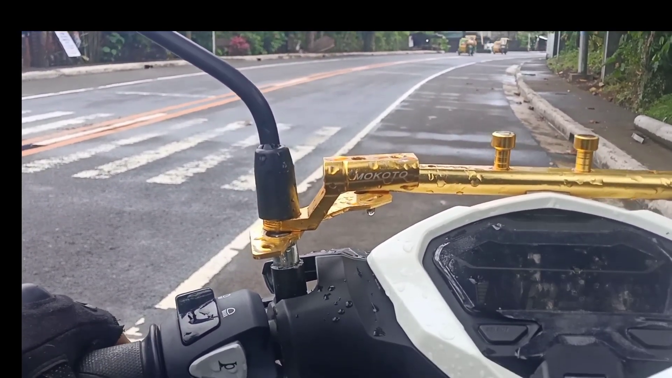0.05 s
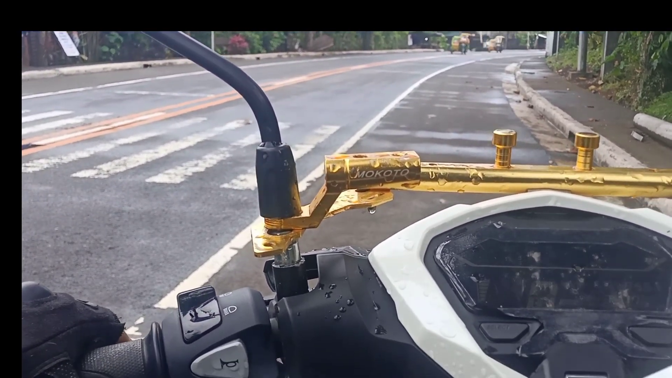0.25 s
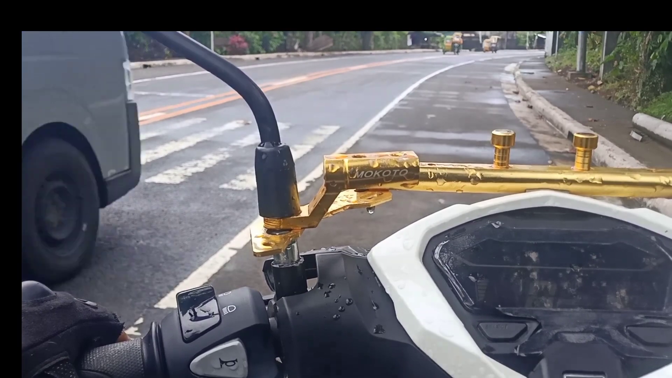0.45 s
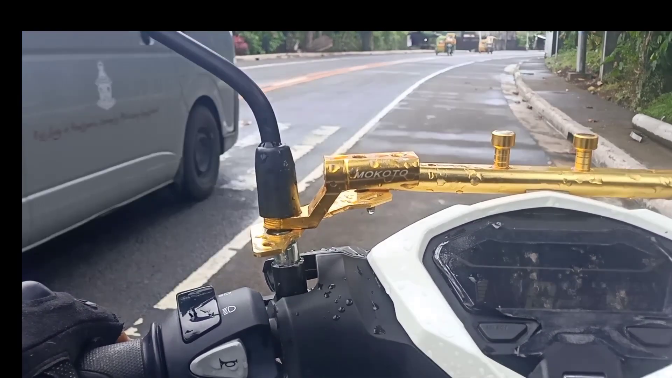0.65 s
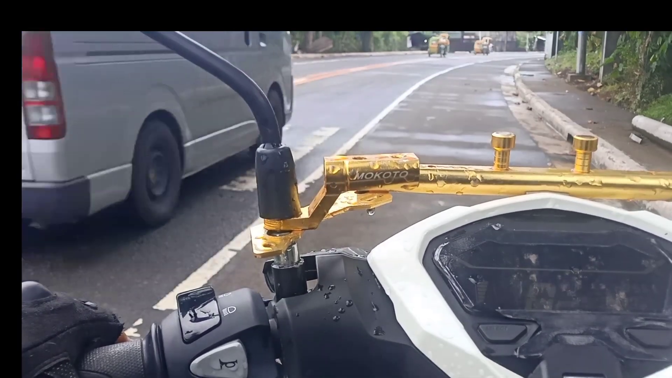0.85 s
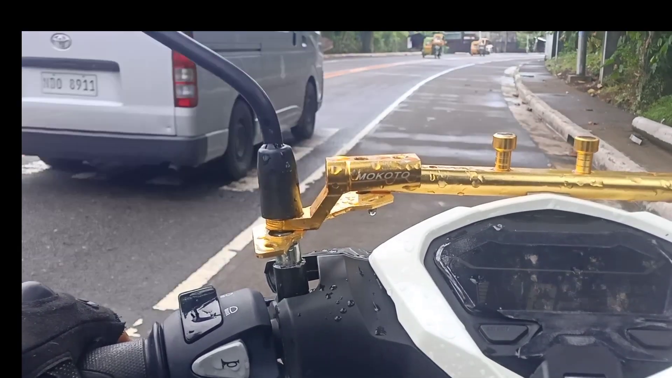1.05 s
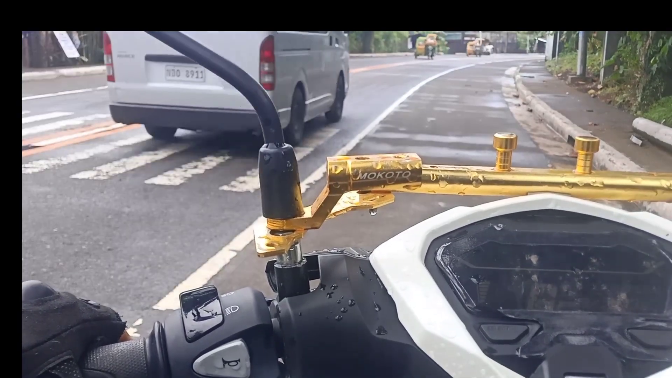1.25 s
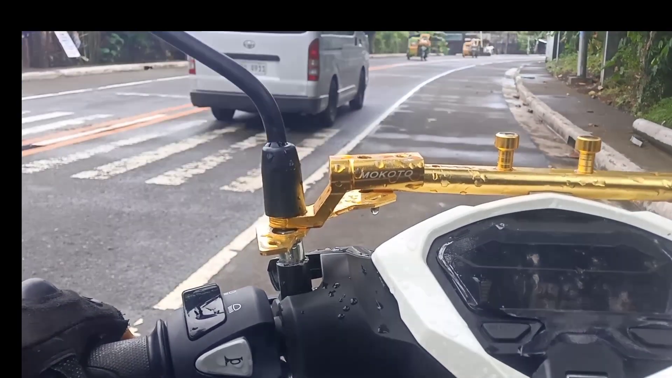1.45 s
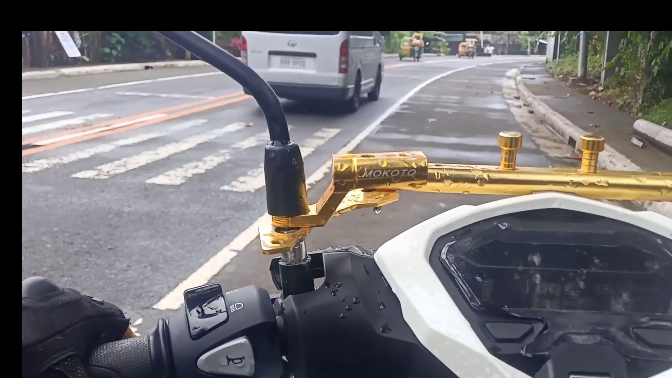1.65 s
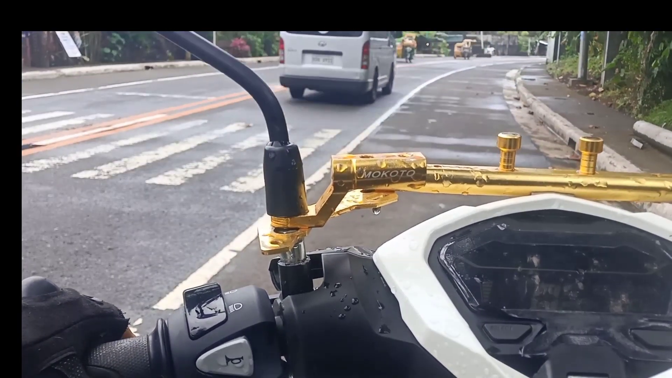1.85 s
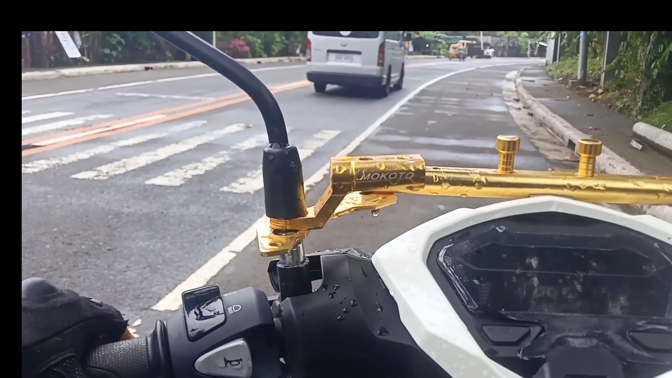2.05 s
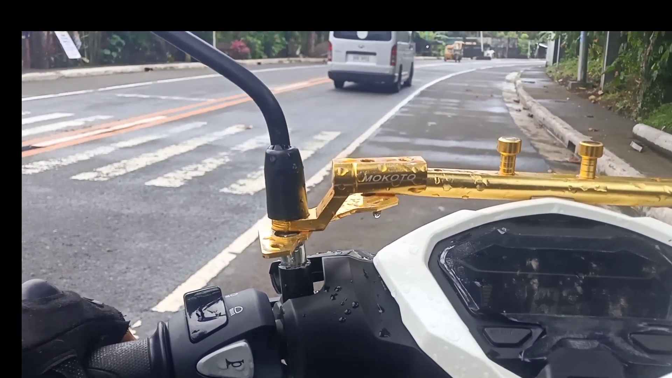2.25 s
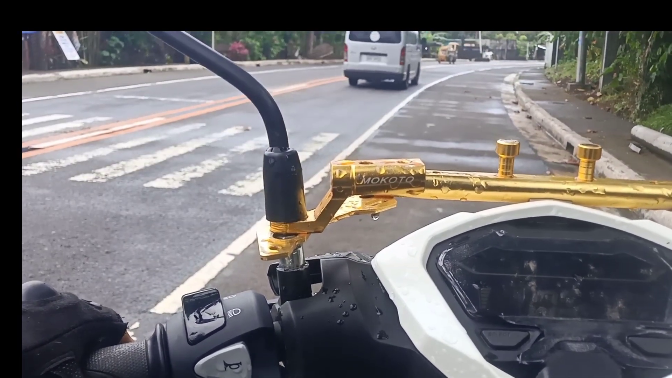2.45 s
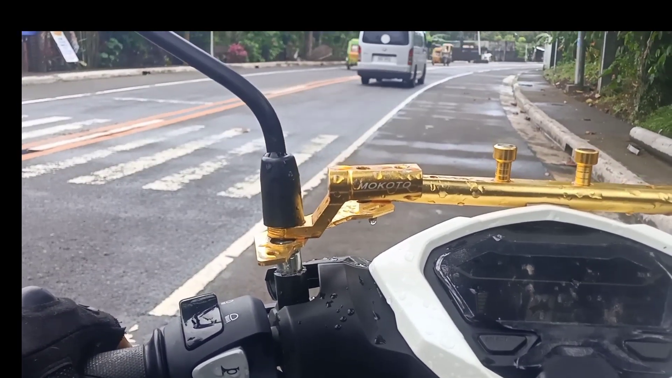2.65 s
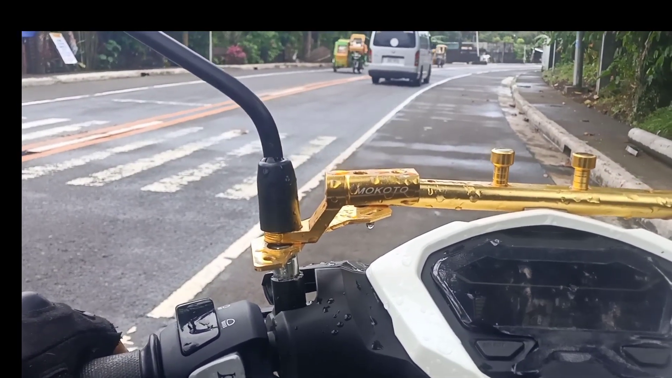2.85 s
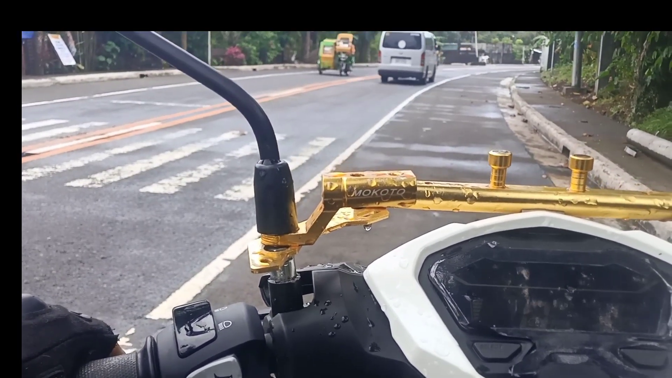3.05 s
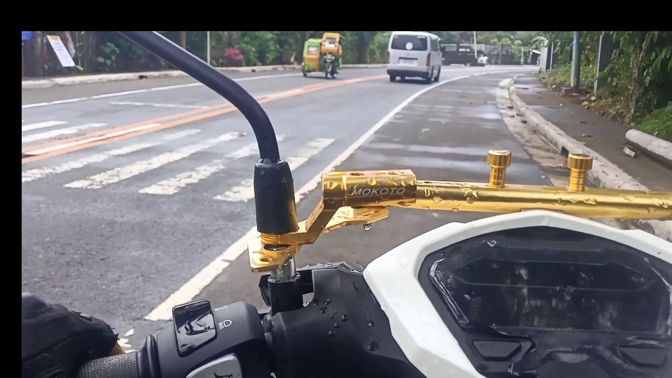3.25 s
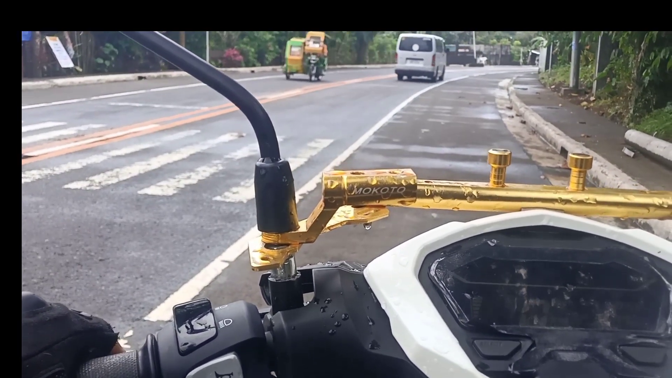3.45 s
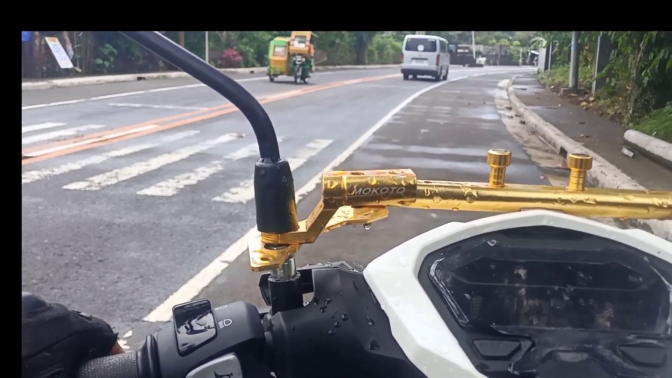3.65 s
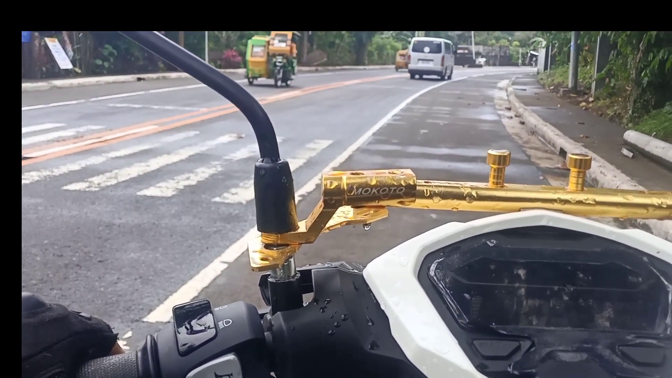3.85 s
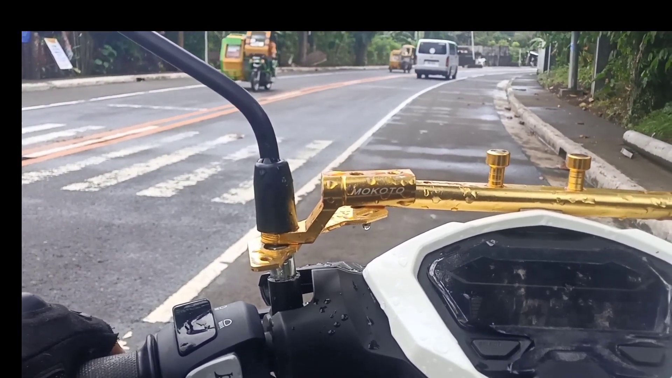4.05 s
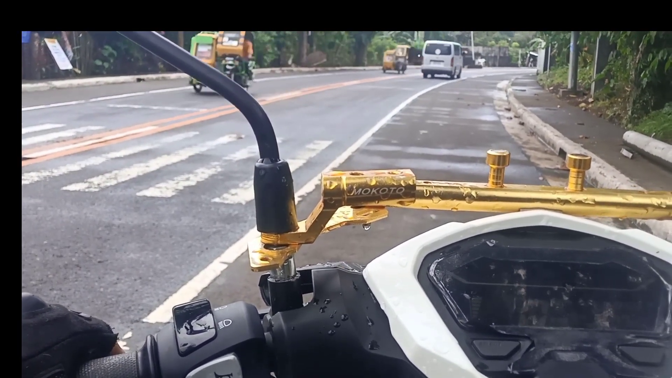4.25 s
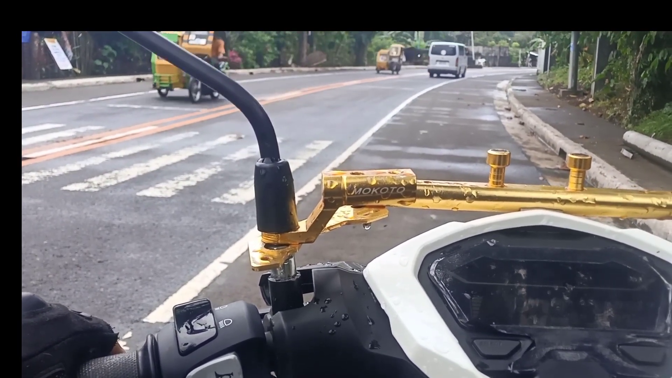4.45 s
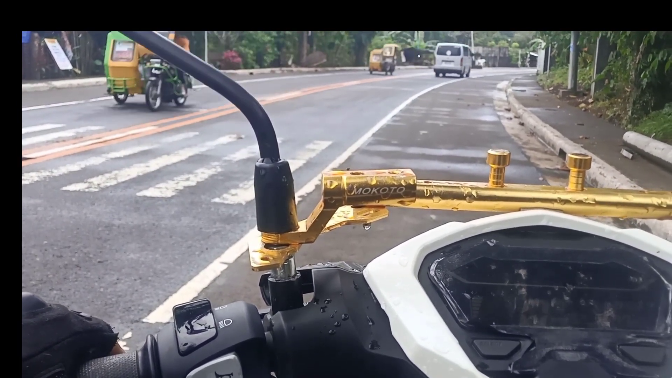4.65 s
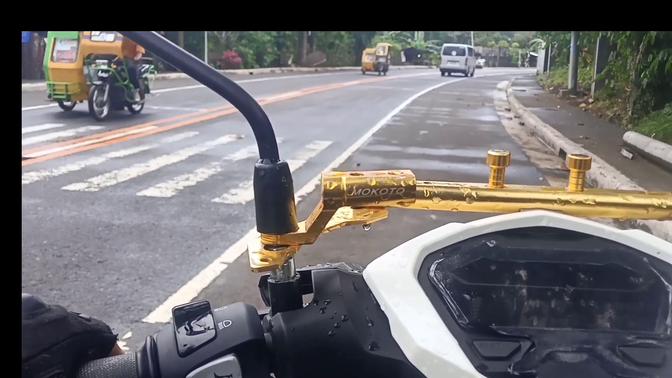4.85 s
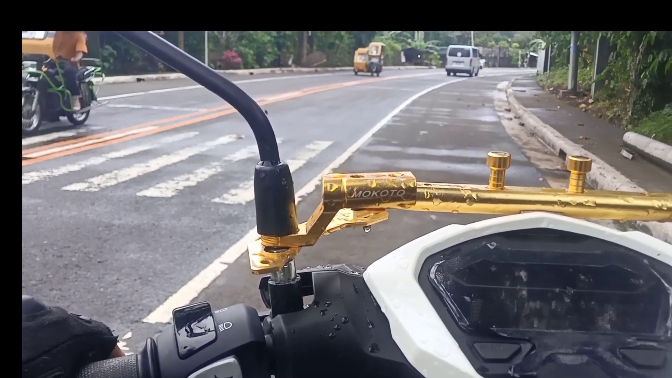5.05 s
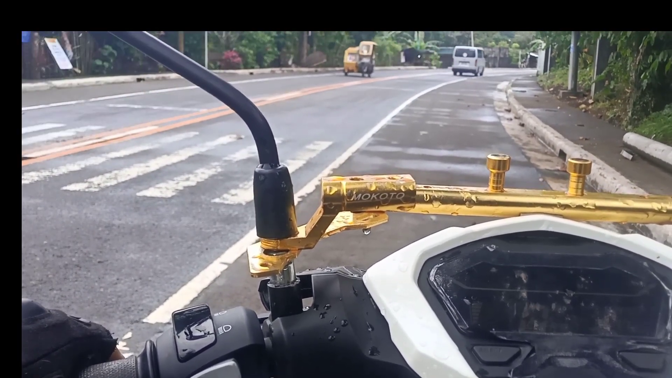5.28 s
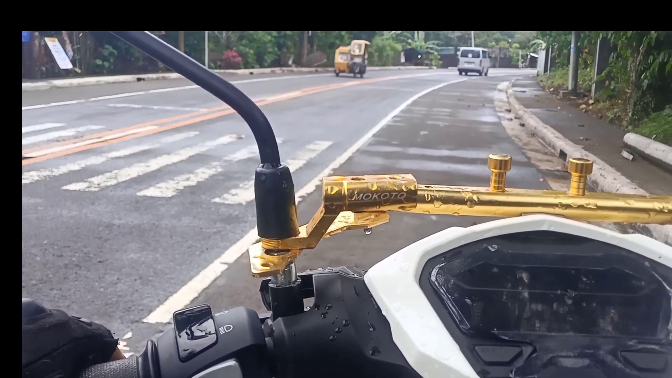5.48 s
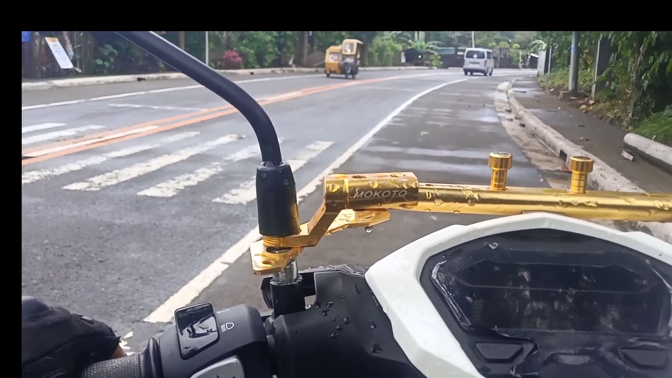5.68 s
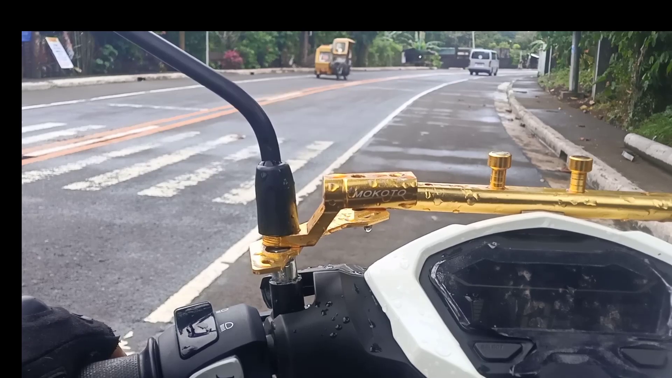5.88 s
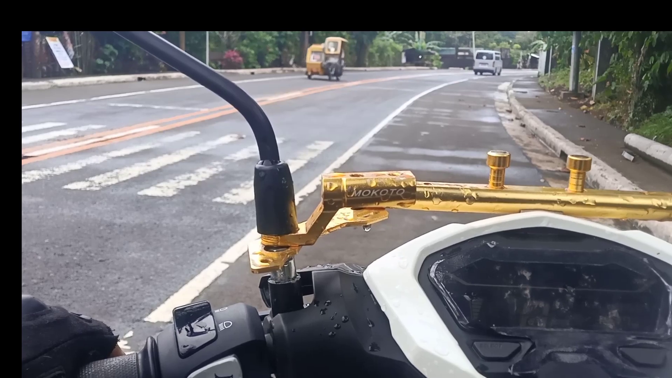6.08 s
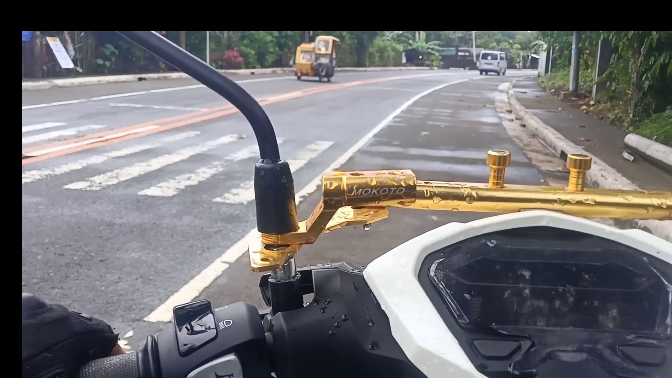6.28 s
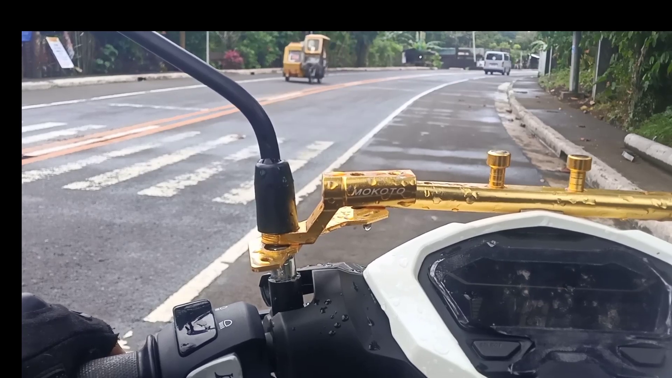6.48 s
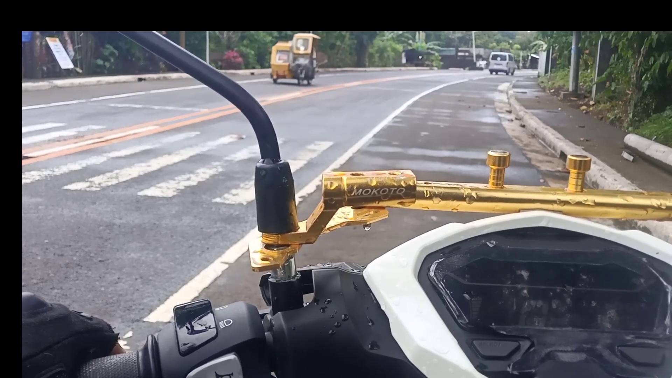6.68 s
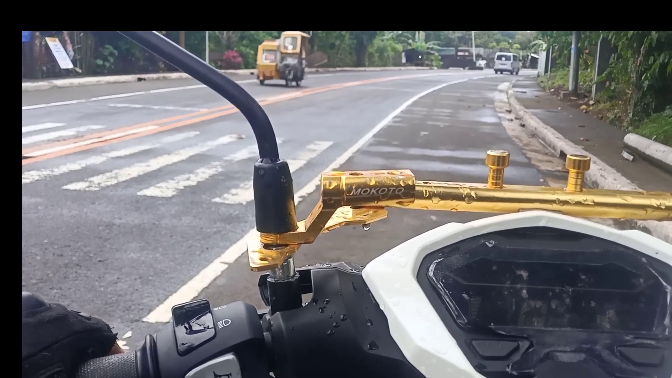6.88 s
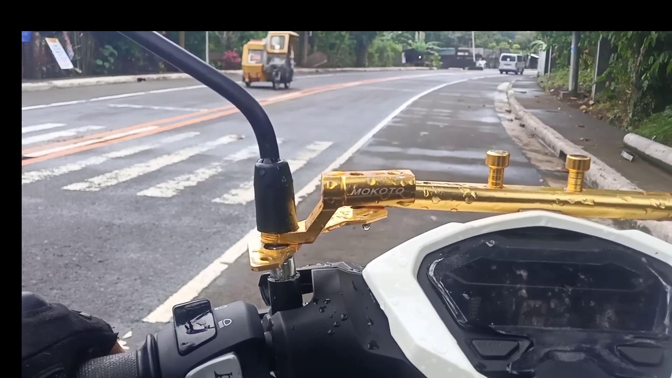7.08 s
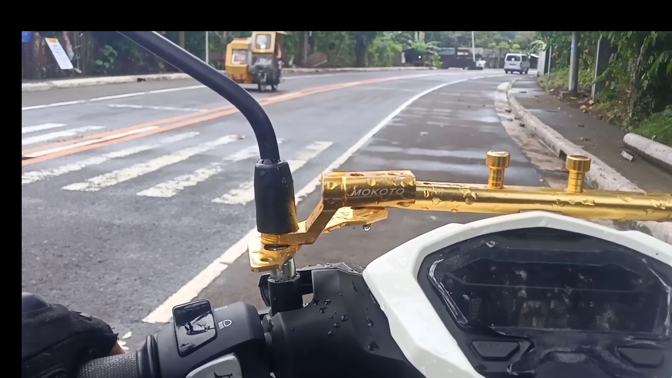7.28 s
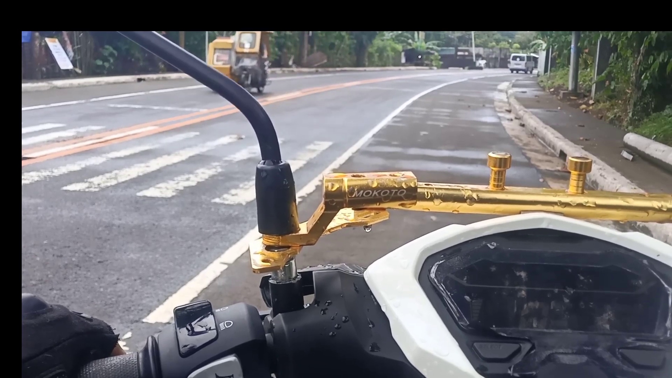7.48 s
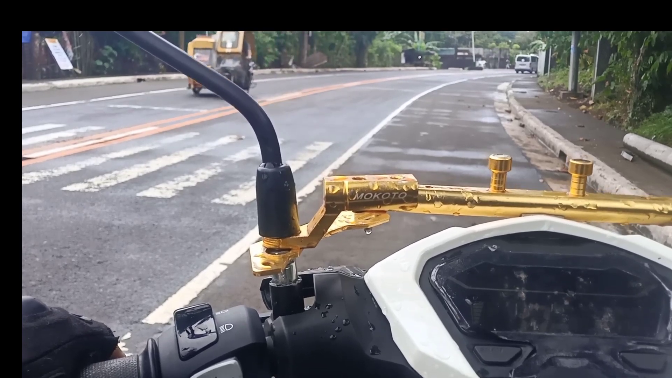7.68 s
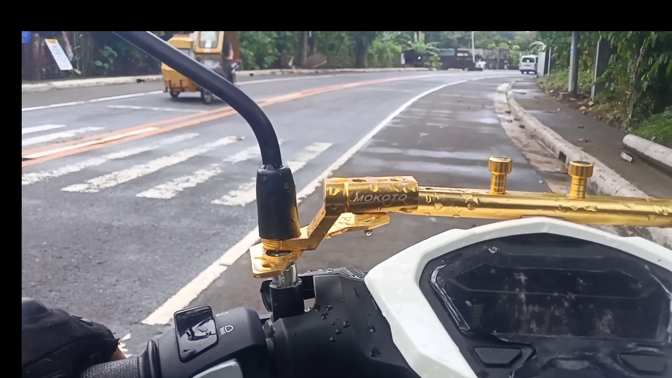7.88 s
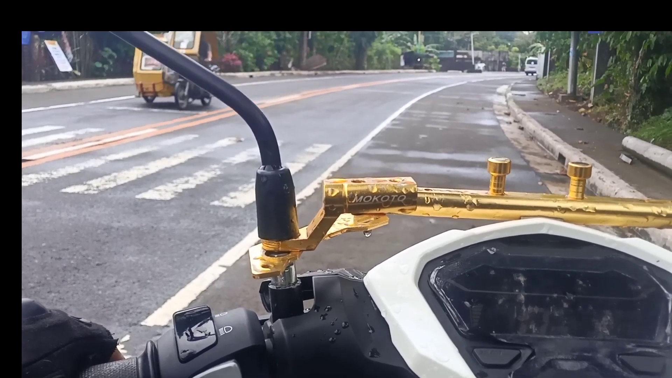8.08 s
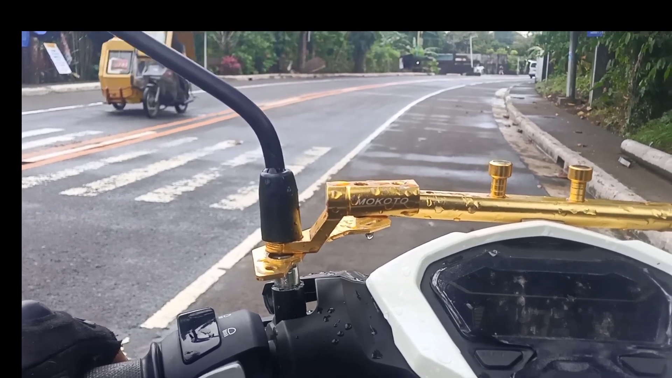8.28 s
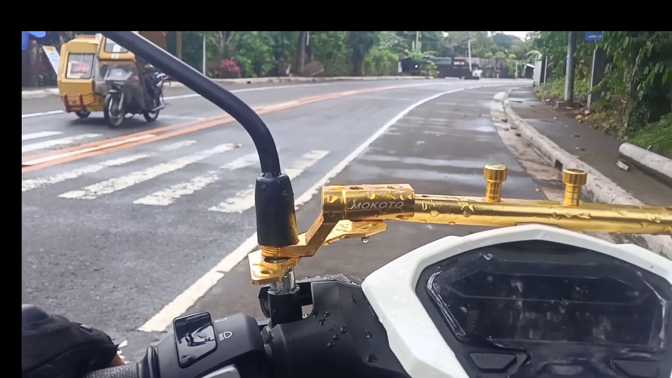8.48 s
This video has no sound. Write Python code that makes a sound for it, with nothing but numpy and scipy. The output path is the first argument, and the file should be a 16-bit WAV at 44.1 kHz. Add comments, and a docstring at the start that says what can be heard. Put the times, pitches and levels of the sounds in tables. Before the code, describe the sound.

A van passes close on a damp road, followed by small motor tricycles puttering and rattling past, with distant traffic underneath.

```python
"""Van and motor tricycles at the roadside.

Heard from a waiting scooter: a diesel van pulls past and drives off, changing gear; its roar and tyre noise
throb with the firing. Single-cylinder tricycles chug along the far lane, slowing: blows ring muffler and pipe,
tin cabs rattle. Damp-road traffic rumbles and hisses underneath. Two microphone ports, alike in the bass, out
of step in the middle; the left one is brighter."""
import sys
import numpy as np
from scipy import signal
from scipy.fft import rfft, irfft, next_fast_len
from scipy.io import wavfile
from scipy.ndimage import uniform_filter1d, map_coordinates

SR = 44100
rng = np.random.default_rng(int(sys.argv[2]) if len(sys.argv) > 2 else 0)


def put_to_file(sound):
    """Save the sound as 16-bit audio at rate SR, in the file named by the first command-line argument."""
    columns = np.atleast_2d(sound).T  # one column per channel
    safe = np.clip(columns, -1, 1)
    whole_steps = np.round(safe * 32767)
    wavfile.write(sys.argv[1], SR, whole_steps.astype(np.int16))


N = 376173
TIME_S = np.arange(N) / SR
LEFT_RIGHT = np.array([[.5], [-.5]])
BLOW_LEAD_S = 0.001  # a blow's suction peaks this long before the firing count turns

# tin cab modes: centre_hz, width_hz, gain_db
TIN_MODES = [(2138, 570, 3.5), (2816, 490, 2), (4130, 770, -4.5)]


def amp(db):
    return 10 ** (np.asarray(db) / 20)


def unit(x):
    return x / np.sqrt(np.mean(x ** 2) + 1e-20)


def along(points, hz):
    """Interpolate (hz, value) points on a log axis."""
    knots_hz, values = np.transpose(points)
    return np.interp(np.log(hz + 1), np.log(knots_hz + 1), values)


def curves(rows):
    """One value per sample for each column after the time."""
    knots_s, *columns = np.transpose(rows)
    return [np.interp(TIME_S, knots_s, column) for column in columns]


def fade(zero_s, full_s):
    return np.clip((TIME_S - zero_s) / (full_s - zero_s), 0, 1)


def wobble(rate_hz):
    """Smooth random curve."""
    return map_coordinates(rng.standard_normal(int(N * rate_hz / SR) + 4), [TIME_S * rate_hz])


def passing(peak_s, rise_s, fall_s, peak_db=0):
    """Level in dB of a passing source: amplitude falls as 1 / distance."""
    t = TIME_S - peak_s
    return peak_db - 10 * np.log10(1 + (t / np.where(t < 0, rise_s, fall_s)) ** 2)


def filtered(x, response):
    """Apply a complex response(hz)."""
    size = next_fast_len(N + SR // 2)
    return irfft(rfft(x, size) * response(np.fft.rfftfreq(size, 1 / SR)), size)[..., :N]


def resonant(x, modes):
    """Parallel resonances of alternating sign."""
    return filtered(x, lambda hz: sum(
        (-1) ** k * amp(db) * 1j * hz * width / (centre ** 2 - hz ** 2 + 1j * hz * width)
        for k, (centre, width, db) in enumerate(modes)))


def swept(x, gain_db):
    """Apply a moving gain_db(hz, sample index)."""
    hz, t, bins = signal.stft(x, SR, nperseg=512)
    at = np.clip((t * SR).astype(int), 0, N - 1)
    return signal.istft(bins * amp(gain_db(hz[:, None] + 1, at)), SR, nperseg=512)[1][:, :N]


def spread(pair):
    """Mix two unrelated signals into partly correlated stereo."""
    # left-right likeness: freq_hz, correlation
    likeness = [(60, 0.9915), (250, 0.9875), (450, 0.92), (650, 0.65), (950, 0.35), (1120, .45),
                (1300, 0.75), (1550, .6), (1800, .25), (2150, 0.5), (2500, .6), (3000, 0.25), (4000, 0.22),
                (8000, 0.44)]
    angle = lambda hz: np.arccos(along(likeness, hz)) / 2
    mid, side = filtered(pair, lambda hz: np.array([np.cos(angle(hz)), np.sin(angle(hz))]))
    return np.array([mid + side, mid - side])


def rush(spectrum, patchy_db):
    """Stereo noise of rms 1 with patches of random gain."""
    bins = signal.stft(rng.standard_normal((2, N)), nperseg=512)[2]
    patches = uniform_filter1d(uniform_filter1d(rng.standard_normal(bins.shape[1:]), 6, 0), 14, 1)
    pair = signal.istft(bins * amp(patchy_db * unit(patches)), nperseg=512)[1][:, :N]
    return unit(spread(filtered(pair, lambda hz: amp(along(spectrum, hz)))))


def roadside_echo(x, wet_db):
    """Direct sound plus a short tail off wall and trees."""
    # tail decay: freq_hz, t60_s
    decay = [(100, 0.36), (1000, 0.36), (6000, 0.093)]
    hz, t, bins = signal.stft(rng.standard_normal((2, SR // 3)), SR, nperseg=256)
    tail = signal.istft(bins * amp(-60 * t / along(decay, hz)[:, None]), SR, nperseg=256)[1]
    wet = signal.fftconvolve(x[None], tail / np.linalg.norm(tail[0]), axes=1)[:, :N]
    return x + amp(wet_db) * spread(wet)


def partials(cycles, multiples, levels_db, flutter_db, in_step=False):
    """Fluttering multiples of one rotation; in step, they dip together once a cycle."""
    return sum(-np.sqrt(2) * amp(db + flutter_db * wobble(9.3))
               * np.cos(2 * np.pi * (k * cycles + (0 if in_step else rng.uniform())))
               for k, db in zip(multiples, levels_db))


def van():
    """Four cylinders: clean crank orders, plus noise that throbs twice a turn."""
    # revs climb, then sink at the gear change: time_s, crank_hz
    revs = [(0.0, 33.2), (0.62, 35.8), (1.13, 37.5), (1.75, 39.9), (1.99, 39.3), (2.27, 36.0)]
    # tones, each loudest as its part draws level: order, peak_s, rise_s, fall_s, peak_db
    orders = [(5, 0.76, 0.046, 0.222, -24.5), (6, 0.36, 0.5, 0.9, -30), (5.5, 0.96, 0.13, 0.28, -29),
              (6.5, 1.3, 0.34, 0.24, -31), (7, 0.86, 0.17, 0.2, -30.5)]
    # engine drone: time_s, order2_db, order4_db
    drone = [(0.0, -21, -27), (0.16, -23.5, -23), (0.69, -18, -26.5), (0.87, -27.5, -35),
             (0.94, -28, -50.5), (1.18, -32, -36), (1.56, -33, -52), (1.89, -33, -31.5), (1.98, -35, -48.5),
             (2.26, -35, -35), (2.35, -42, -52.5), (2.45, -48, -39)]
    # noise spectra of the van's parts: freq_hz, density_db
    roar_shape = [(15, -50), (25, -34), (60, -8), (112, -12.5), (227, 3.5), (297, -2.5), (502, -8),
                  (574, -8.5), (763, -9.5), (900, -26), (1170, -45), (1980, -120)]
    tyre_shape = [(290, -42), (500, 9), (546, 3), (666, -2.5), (780, 0), (1060, 2.5), (1390, -1),
                  (1560, -1), (1830, -6), (2610, -8), (3180, -17.5), (3750, -24), (4280, -27.5),
                  (4990, -30), (5520, -30), (6950, -45), (9040, -48), (15300, -120)]
    flank_shape = [(290, -61), (450, -8.5), (640, -7.5), (780, 1), (950, -5), (1500, -17), (2300, -11.5),
                   (3300, -9), (3800, -14), (4100, -23), (4600, -27), (5100, -31), (5450, -20), (5900, -28),
                   (6950, -41), (9000, -40), (14500, -23.5), (15400, -30)]
    rear_shape = [(220, -60), (340, -2), (520, 0), (640, -3), (770, 2.5), (1000, -7), (1450, -13),
                  (2000, -13), (2350, -10), (2900, -13), (3600, -24), (5000, -38), (5450, -30), (6500, -60)]
    turns = np.cumsum(curves(revs)[0]) / SR
    throb = np.cos(4 * np.pi * turns)
    orders_db = [passing(*row[1:]) for row in orders]
    tones = partials(turns, [row[0] for row in orders], orders_db, flutter_db=1.52)
    tones += partials(turns, (2, 4), curves(drone), flutter_db=0.6)
    roar = amp(passing(0.4, 0.7, 0.55, peak_db=-20.5) + 1.3 * throb) * rush(roar_shape, patchy_db=-2.5)
    tyre_db = passing(0.12, 2.3, 0.5, peak_db=-22)
    db_per_octave = 1.5 + 0.067 * (tyre_db - tyre_db.max())  # duller with distance
    tyres = swept(rush(tyre_shape, patchy_db=1), lambda hz, i: db_per_octave[i] * np.log2(hz / 1500))
    tyres *= amp(tyre_db + 1.1 * throb)
    beaming = 4  # directional: fades faster than by distance alone
    flank = amp(-25 + beaming * passing(0.4, 0.45, 0.33) + 2.1 * throb) * rush(flank_shape, patchy_db=1.5)
    rear = amp(-23 + beaming * passing(0.62, 0.4, 0.5) + 1.5 * throb) * rush(rear_shape, patchy_db=2.5)
    return tones * fade(2.5, 2.3) + flank + rear + (roar + tyres) * fade(2.78, 1.728)


def far_traffic():
    """Lumpy rumble and smoother tyre hiss."""
    # traffic levels: time_s, rumble_db, hiss_db
    levels = [(0, -28.5, -32.5), (2.5, -30.5, -41.5), (4, -27.5, -40.5), (4.8, -27.5, -39.5),
              (6.1, -26, -36), (6.6, -29, -39), (7.1, -32, -42), (7.8, -31.5, -40.5), (8.2, -30, -39),
              (8.53, -28.5, -35)]
    # traffic spectra: freq_hz, density_db
    rumble_shape = [(12, -53), (20, -28), (48, -16), (94, -1.5), (125, -2.5), (281, -6), (393, -13),
                    (524, -11), (831, -20.5), (900, -16), (1170, -55), (1980, -120)]
    hiss_shape = [(290, -30), (500, 3), (623, -7.5), (794, -2.5), (839, -13.5), (947, -2), (1020, 3.5),
                  (1400, -5.5), (1560, -3), (1770, -5), (2790, -11), (3150, -14.5), (3880, -22),
                  (5340, -25.5), (5830, -24), (6950, -34), (9040, -37.5), (14500, -23.5), (15400, -29.5)]
    rumble_db, hiss_db = curves(levels)
    rumble = amp(rumble_db - 1 + 1.3 * wobble(7)) * rush(rumble_shape, patchy_db=0)
    return rumble + amp(hiss_db + 0.22 * wobble(5)) * rush(hiss_shape, patchy_db=1.3)


def road_reflection(x):
    """The echo off the road hollows out one moving band, at times lifts it."""
    # interference band: time_s, centre_hz, gain_db
    hollow = [(.8, 850, 0), (1.1, 800, -7), (1.7, 780, -7), (2.3, 837, -3), (3.5, 801, -4),
              (4.8, 828.5, -7.5), (5.35, 875, -3), (5.6, 800, 2), (5.9, 788, 1), (6.3, 800, 3),
              (6.7, 800, 3), (7.2, 740, -2), (8.53, 740, -1)]
    centre_hz, gain_db = curves(hollow)
    return swept(x, lambda hz, i: gain_db[i] * np.exp(-(np.log(hz / centre_hz[i]) / 0.11) ** 2))


def knocks(hits, t60_cycles, noise):
    """Damped rings with an optional noise burst."""
    track, t = np.zeros(N + SR), np.arange(SR // 8) / SR
    for start_s, db, hz in hits:
        ring = np.sin(2 * np.pi * hz * t) + noise * rng.standard_normal(len(t))
        envelope = amp(db - 60 * t * hz / t60_cycles) * (1 - np.exp(-t * hz * 2.4))
        track[round(start_s * SR):][:len(t)] += envelope * ring
    return track[:N]


def low_thumps():
    """Dull low thumps."""
    # thumps: start_s, level_db, pitch_hz
    jolts = [(0.82, -7, 252.8), (0.939, -5, 215.2), (1.05, -11, 221.5), (1.1, -11, 222.3),
             (2.419, -14.5, 250.7), (5.546, -11.5, 139.8), (5.6555, -5.5, 150.2), (6.423, -18, 113),
             (7.231, -10.5, 138.1), (7.278, -16, 129.6), (7.52, -13.5, 135.5), (8.228, -11.5, 147.4),
             (8.265, -14.5, 139.2), (8.487, -14, 161.9)]
    return roadside_echo(knocks(jolts, t60_cycles=13, noise=0), wet_db=-4.5)


def clatter(blows, effort_db, low_hz, high_hz, high_db):
    """Valve gear and body: bands of noise that swell at each blow."""
    # upper band flares: peak_s, rise_db
    flares = [(7.24, 9), (7.51, 11)]
    # nearest tricycle's body band: time_s, centre_hz
    glide = [(5.2, 1106), (5.9, 981), (6.4, 930.4), (6.9, 802.3)]
    decay_s = 0.0048
    puffs = signal.lfilter([1], [1, -np.exp(-1 / (decay_s * SR))], np.abs(blows))
    noise = spread((uniform_filter1d(puffs, size=90) + 0.75) * rng.standard_normal((2, N)))

    def band(centre_hz, width):
        return unit(swept(noise, lambda hz, i: -12 * np.log1p((np.log(hz / centre_hz[i]) / width) ** 2)))

    flare_db = sum(db * np.exp(-((TIME_S - peak_s) / 0.025) ** 2) for peak_s, db in flares)
    low = amp(-46 + 0.65 * (effort_db + 33)) * band(low_hz, width=0.197)
    high = amp(high_db + flare_db) * band(high_hz, width=0.065)
    body_db = passing(6, 0.8243, 1.11, peak_db=-41.5) + LEFT_RIGHT  # 1 dB louder on the left
    return low + high + amp(body_db) * band(curves(glide)[0], width=0.14)


def firing_count():
    """Tricycle firings so far, restarting with each stretch."""
    # stretches (throttle open, coasting, open), each with rows: time_s, firing_hz
    stretches = [
        [(1.6219, 37.2), (2.25, 36.95), (3.55, 36.98)],
        [(3.6029, 35.05), (4.2, 35.95), (4.7, 30.39), (5.3, 27.62), (6.0, 26.16), (6.95, 22.76), (7.68, 26.87)],
        [(7.784, 26.6), (8.14, 26.85), (8.53, 27.6)],
    ]
    count = np.zeros(N)
    for rows in stretches:
        start = round(rows[0][0] * SR)
        count[start:] = np.cumsum(curves(rows)[0][start:]) / SR
    return count


def cylinder_blows(count):
    """Two trains of suction pulses, alike in timing, uneven in strength."""
    # strength scatter, least under throttle and when near: time_s, scatter_db
    scatter = [(2.6, 5), (2.9, 1), (3.45, 1), (3.6, 5), (4.8, 3.5), (5.1, 2.5), (6.3, 2.5), (7.2, 5),
               (7.8, 3)]
    # blows that stand out: time_s, level_db
    accents = [(3.763, 4), (3.802, 5), (3.83, 7), (3.857, 8), (4.069, 4), (4.287, 5), (4.392, 7), (4.58, 6),
               (4.774, 6), (4.807, 6), (5.073, 4), (5.151, 7), (5.187, 4), (5.258, 5), (5.294, 6),
               (5.44, 7), (5.477, 3), (5.55, 5), (5.586, 4), (5.661, 8), (5.698, 6), (5.773, 7), (5.81, 4),
               (5.848, 5), (5.924, 5), (5.962, 2), (6.038, 5), (6.194, 5), (6.273, 5), (6.35, 4),
               (6.393, 5), (6.43, 4), (7.896, 4), (8.151, 3), (8.188, 4), (8.445, 2), (8.481, 6)]
    at = np.flatnonzero(np.diff(np.floor(count)))
    jitter, strength, split = np.tanh(rng.standard_normal((len(at), 3))).T
    shift_s = 0.0006 * jitter - 1.5 * BLOW_LEAD_S
    at = np.clip(at + (shift_s * SR).astype(int), 0, N - 1)
    size_db = curves(scatter)[0][at] * strength + 2.5 * split * [[1], [-1]]
    for time_s, db in accents:
        nearest = np.argmin(np.abs(at - time_s * SR))
        at[nearest] = round((time_s - BLOW_LEAD_S / 2) * SR)
        size_db[:, nearest] = db
    blows = np.zeros((2, N))
    blows[:, at] = -amp(size_db)
    return blows


def exhaust(blows, deep_db, thud_db, effort_db):
    """Softened blows thud in the muffler and bark in the pipe."""
    # muffler and pipe modes: centre_hz, width_hz, gain_db
    deep_mode = [(88, 98, 0)]
    muffler_modes = [(128, 66, 0), (189.4, 108.3, -5.5)]
    pipe_modes = [(255, 190, 3), (520, 150, -11)]
    soft = uniform_filter1d(blows[0], size=21)
    deep = amp(deep_db) * unit(resonant(soft, deep_mode))
    thud = amp(thud_db) * unit(resonant(soft, muffler_modes))
    pipe = resonant(uniform_filter1d(blows[1], size=45), pipe_modes)
    bark = amp(effort_db) * unit(resonant(pipe, [(300, 480, 0)]))
    return amp(-6.5) * (deep + thud + bark)


def valve_ticks(blows):
    """A tinny tick at each firing, loudest under open throttle."""
    ring = resonant(resonant(blows, TIN_MODES[:1]), TIN_MODES[:1])
    return amp(passing(3.15, 0.4, 0.25, peak_db=-52.5)) * unit(ring)


def tricycle():
    """One cylinder drives exhaust, valves, clatter and pipe song."""
    # engine controls: time_s, deep_db, thud_db, effort_db, low_clatter_hz, high_clatter_hz, high_db
    controls = [(1.4, -47.5, -39, -20.5, 1971, 3663, -61.5), (1.8, -42, -31.5, -32.5, 1973, 3922, -59),
                (2.6, -42, -34.5, -40, 2105, 3914, -77), (3.05, -40, -35.5, -32.5, 2275, 4338, -57.5),
                (3.4, -41.5, -41, -28, 2142, 4272, -62.5), (3.6, -48, -37, -39.5, 2177, 3960, -63),
                (3.8, -47, -29, -33, 2206, 4272, -60.5), (4.5, -44.5, -35.5, -33, 2131, 3878, -64.5),
                (4.75, -43, -28.5, -31.5, 2146, 3944, -64.5), (5.05, -45, -33, -29.5, 2236, 4134, -61),
                (5.22, -45, -30.5, -29.5, 2280, 4120, -55.5), (5.4, -44, -31, -29, 2309, 4030, -53),
                (5.53, -42, -29.5, -26, 2345, 3832, -56), (5.7, -45, -28, -27.5, 2410, 3700, -60),
                (6.12, -41, -27, -27.5, 2517, 3593, -59.5), (6.6, -32, -32, -40, 2345, 3863, -70),
                (7.1, -34.5, -29, -42.5, 2200, 3725, -60.5), (7.7, -39, -28, -41, 2037, 3966, -62.5),
                (8.05, -41, -28.5, -35, 2036, 3830, -54), (8.3, -40.5, -33, -31.5, 1997, 3787, -55.5),
                (8.53, -40, -30.5, -29, 2024, 3846, -55.5)]
    deep_db, thud_db, effort_db, low_hz, high_hz, high_db = curves(controls)
    count = firing_count()
    blows = cylinder_blows(count)
    ticks = valve_ticks(blows[1])
    pipe_echo_s = 0.00703  # each blow returns once along the pipe
    blows += 0.2 * filtered(blows, lambda hz: np.exp(-2j * np.pi * hz * pipe_echo_s))
    engine = clatter(blows[1], effort_db, low_hz, high_hz, high_db)
    engine += roadside_echo(exhaust(blows, deep_db, thud_db, effort_db) + ticks, wet_db=-8)
    median_hz = SR * np.median(np.diff(count))
    return engine * fade(0.98, 0.9829) + pipe_song(count + BLOW_LEAD_S * median_hz)


def cab_rattle():
    """Loose tin knocks sharply; faint random knocks fall between."""
    # sharp knocks: start_s, level_db, pitch_hz
    sharp = [(2.9696, -30, 2070), (3.0242, -31.5, 2275), (3.104, -29, 2192), (3.2405, -29.5, 2220),
             (3.4291, -29, 2270), (5.303, -34, 2156), (5.4036, -27.5, 2150), (5.6241, -23.5, 1974),
             (5.67, -23.5, 2394), (7.2534, -31.5, 1870), (7.5009, -27.5, 1929), (7.5343, -27.5, 1950),
             (8.077, -29.5, 2216), (8.2242, -26.5, 1946), (8.2598, -28, 1990), (8.2985, -22, 2076),
             (8.3401, -28.5, 1987), (8.3795, -28, 2176), (8.4528, -27, 2063), (8.481, -24.5, 1963)]
    faint = [(2 + 6.5 * when, -37.5 - 6 * softness, 2100 * (0.9 + 0.25 * pitch))
             for when, softness, pitch in rng.uniform(size=(19, 3))]
    tin = resonant(knocks(sharp + faint, t60_cycles=32, noise=0.86), TIN_MODES[:2])
    return roadside_echo(tin, wet_db=-4.5)


def pipe_song(count):
    """Under load the pipe sings at multiples of the firing rate."""
    # singing harmonics: firing_multiple
    multiples = (4, 5, 6, 7, 9, 11, 13)
    # spells of song: start_s, end_s, then level_db per multiple
    spells = [(2.947, 3.427, -50.5, -43.5, -40.5, -34.5, -32.5, -61.5, -40),
              (7.944, 8.451, -42.5, -35.5, -35, -44, -36, -44.5, -46.5)]
    attack_s, release_s = 0.307, 0.16
    return sum(partials(count, multiples, levels_db, flutter_db=1.5, in_step=True)
               * fade(start_s - attack_s, start_s) * fade(end_s + release_s, end_s)
               for start_s, end_s, *levels_db in spells)


def scene():
    traffic = road_reflection(van() + tricycle() + far_traffic())
    return traffic + amp(-3) * (cab_rattle() + low_thumps())


def record(dry):
    """Each port has its own colour and a phase that turns with bearing; deep bass and top fall away."""
    # port colour: freq_hz, left_minus_right_db
    tilt = [(60, 0.5), (100, -0.5), (170, 0.5), (290, 0.5), (480, 1.0), (810, 1), (1360, -1.5), (2290, 2.5),
            (3860, 9.5), (5500, 7.5), (8000, -2)]
    # port phase for sound from alongside and from ahead: freq_hz, left_lead_rad
    side_phase = [(20, -.1), (120, -.2), (250, -.3), (470, -.5), (690, -.9), (950, -1), (1120, -1.8),
                  (1300, -2.6), (1550, -2.7), (1800, -1.6), (2150, -.3), (2500, .7), (3400, -.3),
                  (4500, -1.2), (6000, -2)]
    ahead_phase = [(20, 0), (450, 0), (690, .1), (950, -.3), (1120, -.4), (1300, -2.2), (1550, -1.6),
                   (1800, .1), (2500, .4), (3600, -1), (4300, 0), (6000, -2)]
    # bearing of the loudest traffic: time_s, alongside_share
    bearing = [(0, 1), (.6, 1), (1.4, 0), (4.7, 0), (5.7, 1), (8.53, 1)]
    dry = dry * fade(0, 0.003)

    def ports(phase):
        def response(hz):
            rolloff_db = -3.5 * np.log1p((hz / 6300) ** 12) - 4.2 * np.log1p((52 / (hz + 1)) ** 4)
            gain = amp(LEFT_RIGHT * along(tilt, hz) + rolloff_db)
            return gain * np.exp(1j * LEFT_RIGHT * along(phase, hz))
        return filtered(dry, response)

    alongside, = curves(bearing)
    heard = alongside * ports(side_phase) + (1 - alongside) * ports(ahead_phase)
    self_noise = amp(-84) * rng.standard_normal(dry.shape)
    return filtered(heard + self_noise, lambda hz: hz < 15450)


dry = scene()
out = record(dry)
put_to_file(out)
```